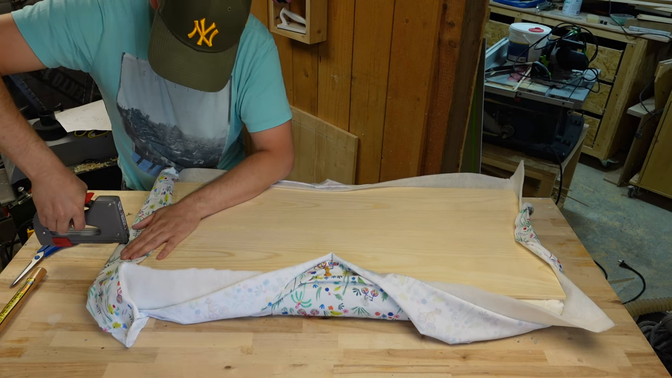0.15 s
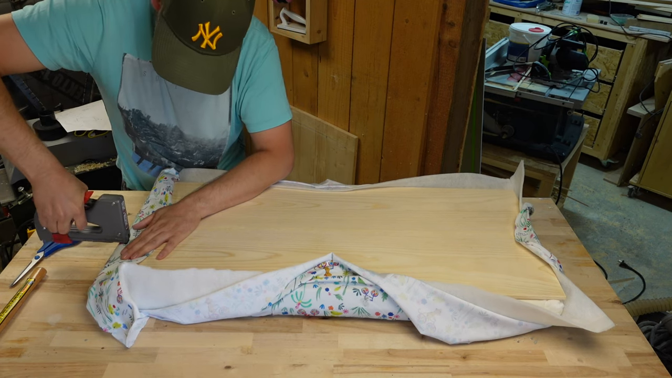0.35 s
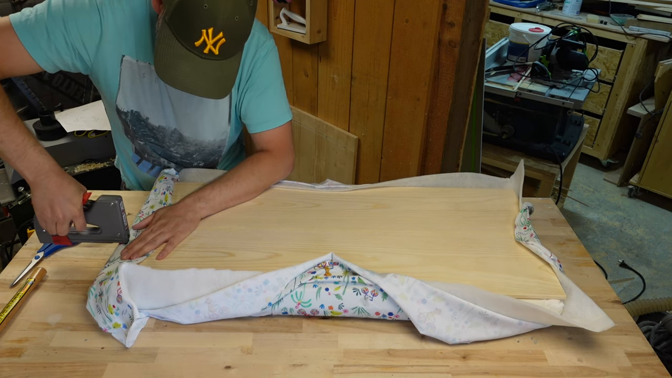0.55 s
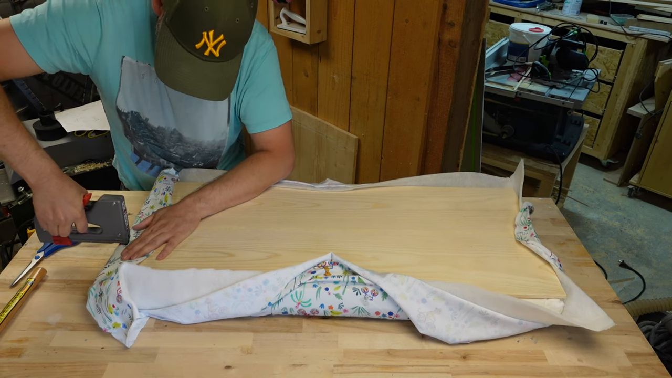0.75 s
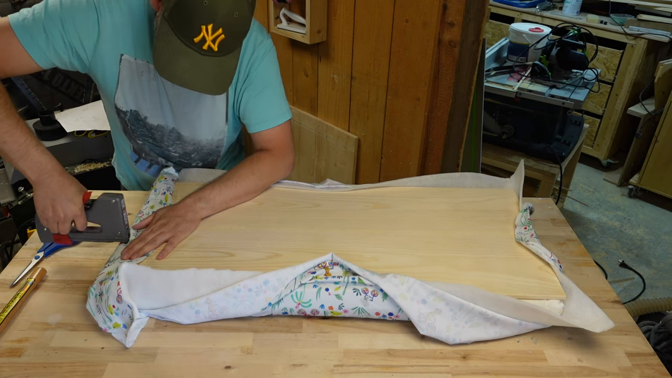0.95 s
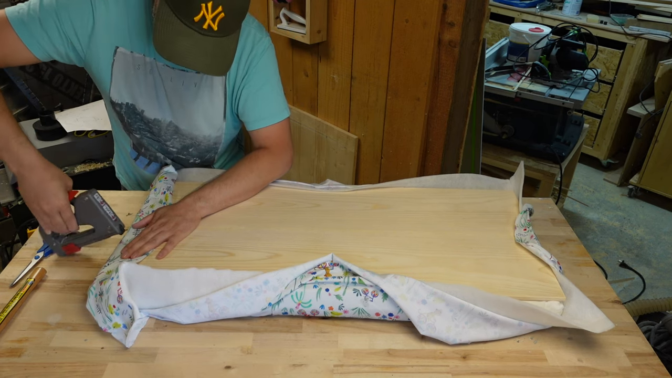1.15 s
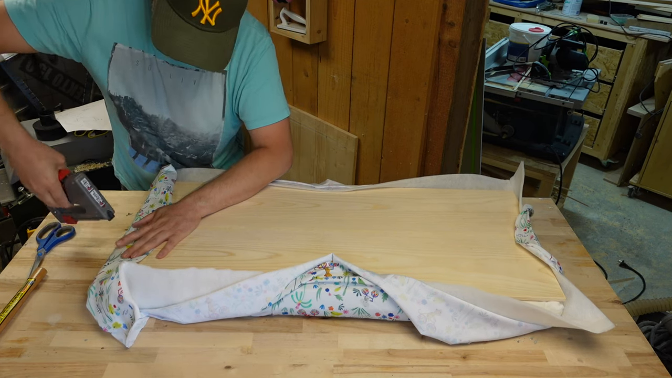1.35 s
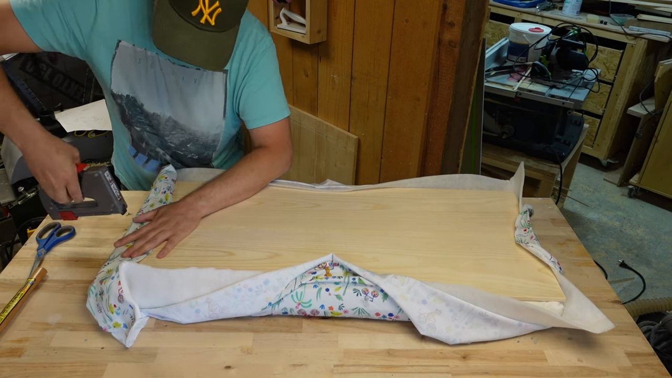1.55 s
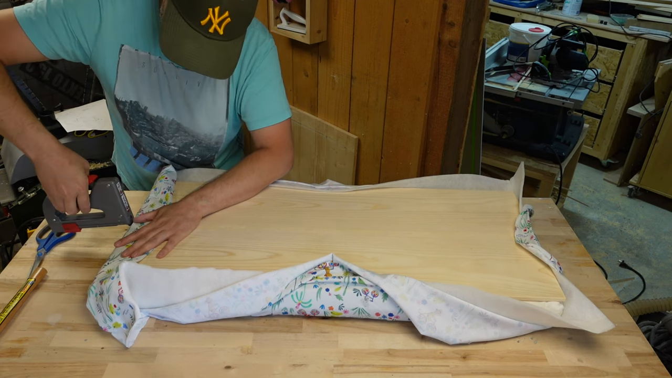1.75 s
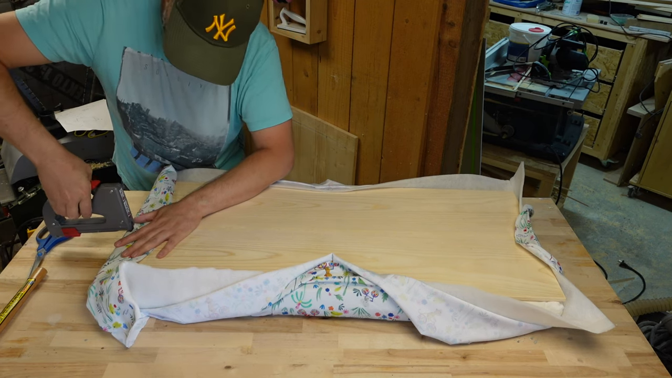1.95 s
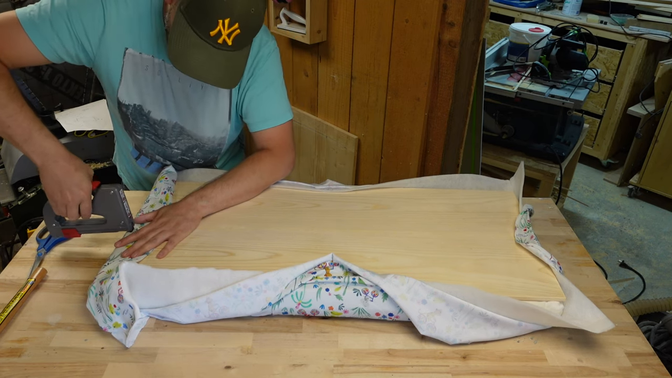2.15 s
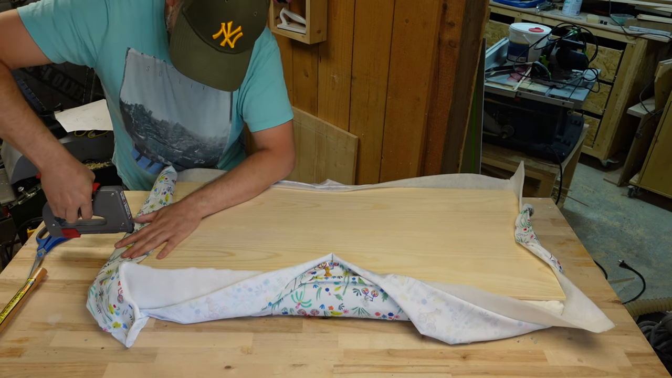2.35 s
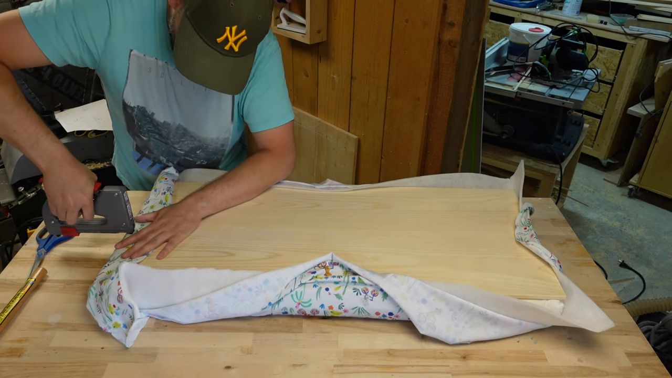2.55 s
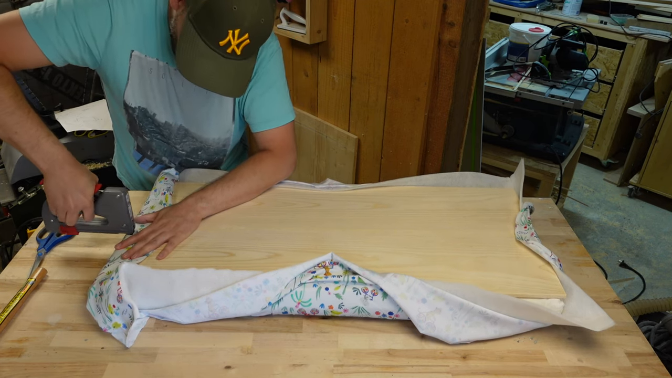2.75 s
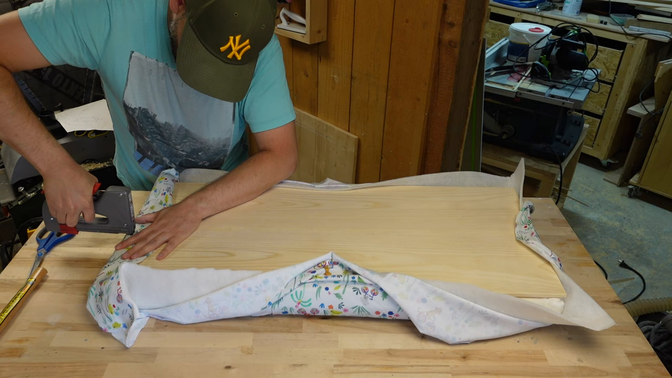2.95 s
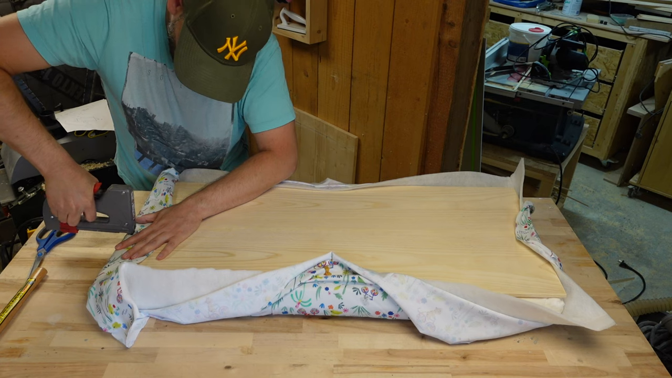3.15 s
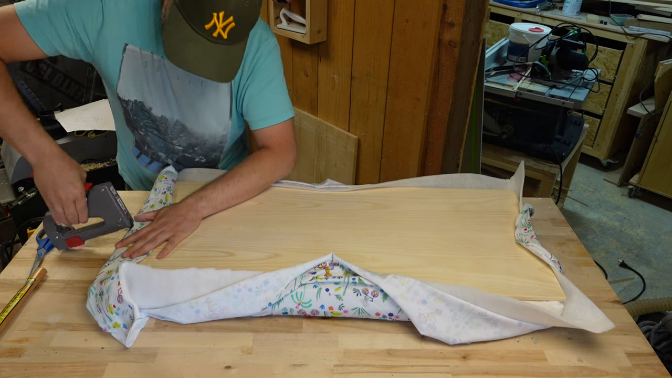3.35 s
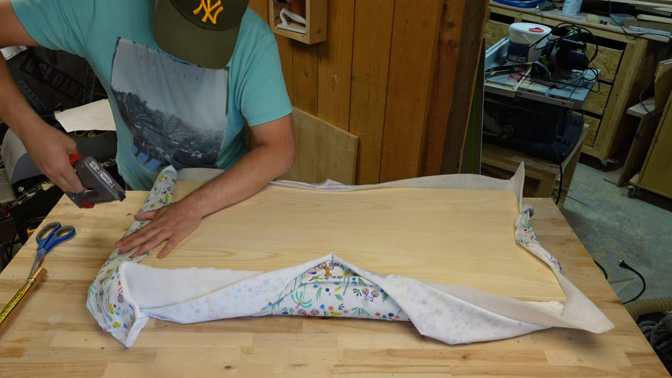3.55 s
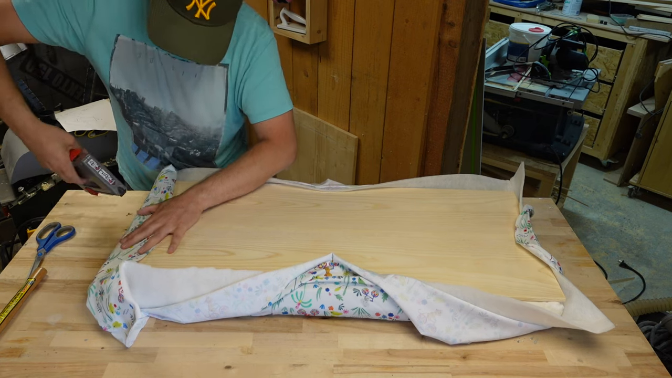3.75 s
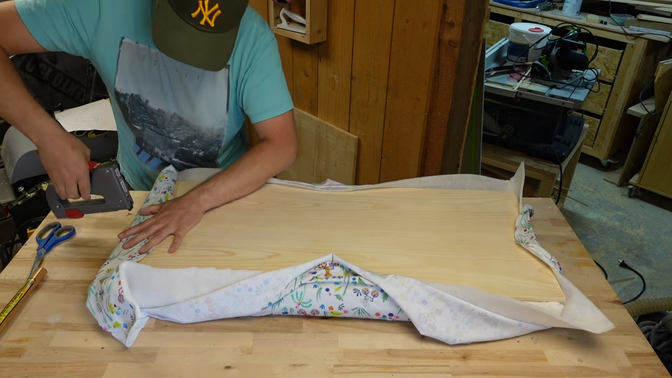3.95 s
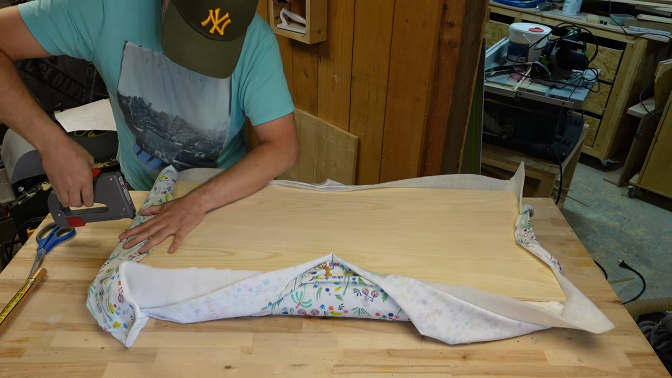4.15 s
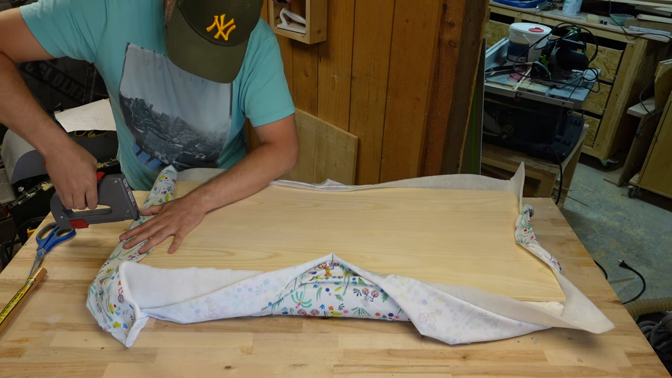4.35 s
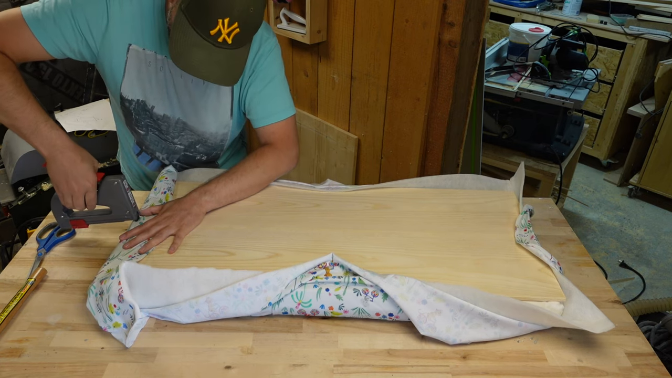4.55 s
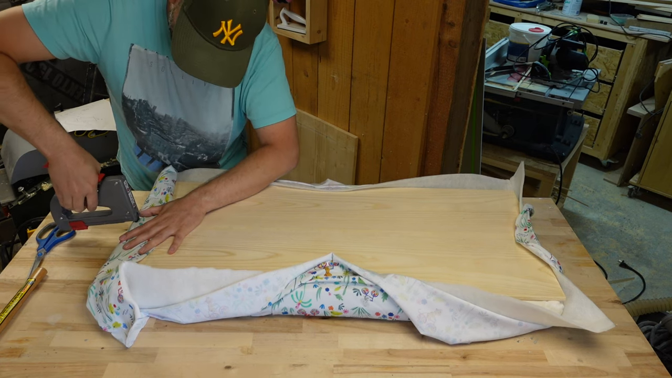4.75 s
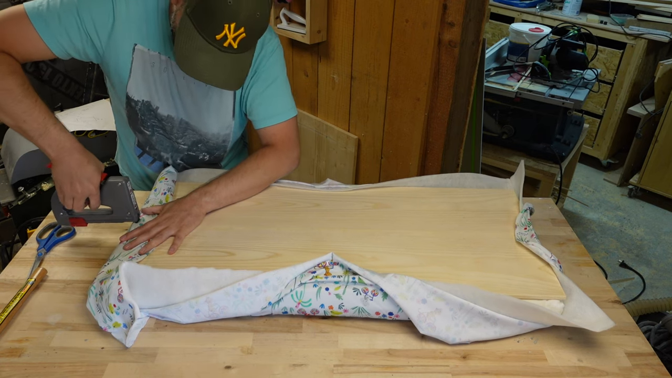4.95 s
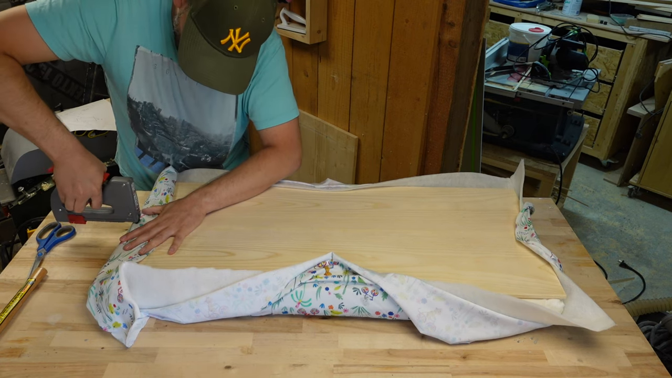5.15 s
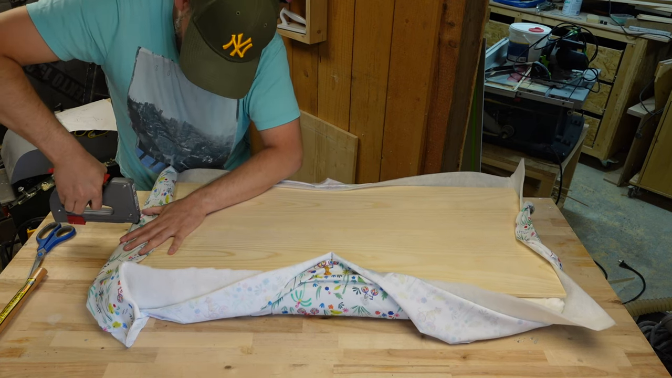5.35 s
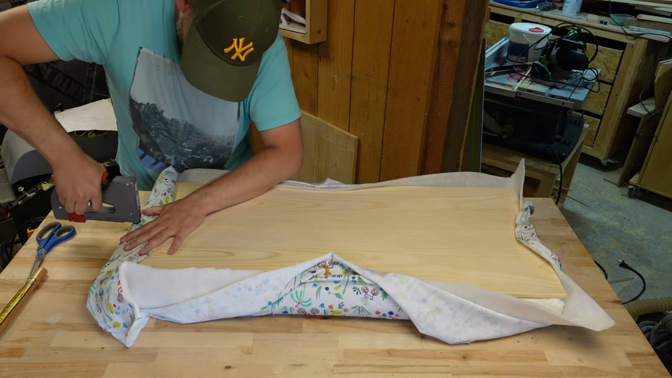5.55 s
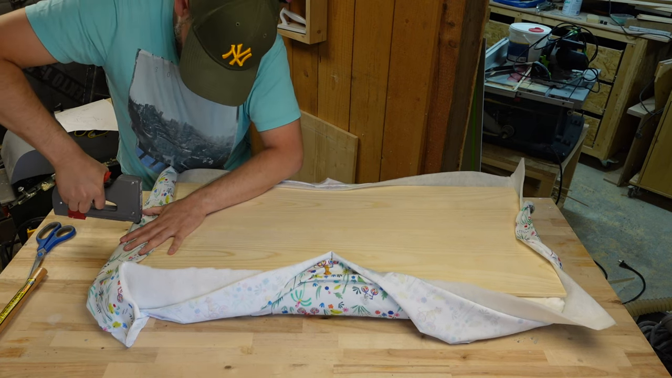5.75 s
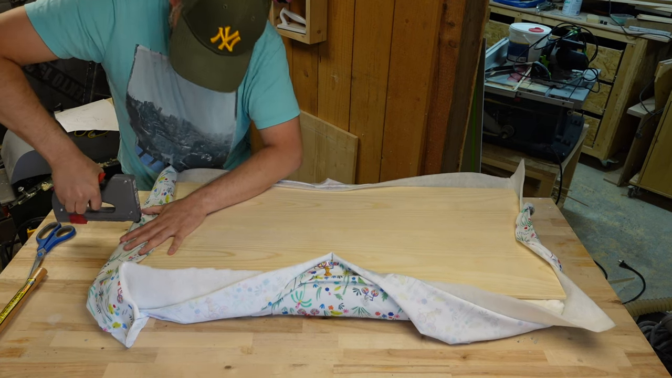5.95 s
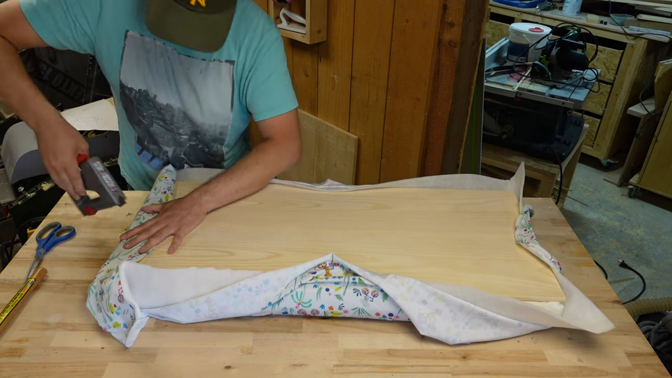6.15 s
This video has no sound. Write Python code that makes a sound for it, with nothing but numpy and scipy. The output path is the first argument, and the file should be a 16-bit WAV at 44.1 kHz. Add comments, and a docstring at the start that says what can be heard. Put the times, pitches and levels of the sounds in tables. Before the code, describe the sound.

A hand staple gun fires three times through fabric into a wooden board, heard close in a small workshop with a short echo and a faint steady hush. Light taps and spring ticks open, then the first loud, sharp bang comes at 0.75 seconds with a brief spring buzz. At about 1.0 the handle clatters back with a thin ping, the board thumps on the bench, and a few small knocks follow. Faint cloth rustle, scuffs and taps lead to the second bang at 3.0 seconds, with its clatter and thump at 3.3. After a quieter stretch, soft rustling returns near 4.8, and the gun taps and its spring ticks from about 5.1. The third bang lands at 5.75 seconds, followed by the handle's clatter and a wooden knock at about 6.0. The three shots are much louder than everything else.

```python
"""A hand staple gun fires three staples through fabric into a board on a workshop bench.
Its spring ticks under the squeeze, the latch trips and the striker bangs; then the handle clatters back
and the board knocks on the bench. Each impact is a brief force that excites the damped modes of a part.
Friction makes the cloth rustle between shots, the small room reverberates, and a limiter flattens
the loud blows."""
import sys
import numpy as np
from scipy import signal
from scipy.fft import rfft, irfft
from scipy.io import wavfile
from scipy.ndimage import uniform_filter1d, minimum_filter1d

SR = 44100
rng = np.random.default_rng(int(sys.argv[2]) if len(sys.argv) > 2 else 0)


def put_to_file(sound):
    """Save the sound as 16-bit audio at rate SR, in the file named by the first command-line argument."""
    columns = np.atleast_2d(sound).T  # one column per channel
    safe = np.clip(columns, -1, 1)
    whole_steps = np.round(safe * 32767)
    wavfile.write(sys.argv[1], SR, whole_steps.astype(np.int16))


N = 274302

# the latch trips and the striker drives a staple:
# (time [s], level [dB], resonance [Hz], latch lead [s], latch level [dB], latch resonance [Hz])
STAPLE_SHOTS = [(.751, 16.5, 1800, .031, -20.5, 3090), (3.030, 17, 1950, 0.013, -17, 1930),
                (5.7548, 17, 1830, .0174, -17, 1970)]
# the nose is pressed home: (time [s], level [dB], tilt [dB/octave], delay of the lever's slack [s])
NOSE_PRESSES = [(0.303, -33, 0, .031), (.478, -44.5, 8, .031), (2.787, -32.5, -0.5, .025),
                (5.497, -30, -1, 0.024)]
# normal modes of the gun's casing: (frequency [Hz], level [dB], T60 [s])
GUN_MODES = [(1064, -9, 0.16), (1374, -15.5, 0.11), (1553, -1, 0.13), (2080, 1, 0.018), (2330, -0.5, 0.017),
             (2910, 2.5, 0.1), (3000, -2, 0.077), (4080, -1, 0.059), (4650, -8, 0.019), (4300, -5, 0.045),
             (4800, -5.5, 0.013), (5630, -5.5, 0.083)]


def amp(db):
    """Decibels are logarithmic: 20 dB is a factor of ten in amplitude."""
    return 10 ** (np.asarray(db) / 20)


def unit_rms(x):
    """Normalisation to a mean power of one."""
    return x / np.sqrt(np.mean(x ** 2) + 1e-20)


def unit_blow(x):
    """Normalisation to the energy of 5 ms at full level."""
    return x / np.linalg.norm(x) * np.sqrt(.005 * SR)


def curve_at(points, hz):
    """Interpolation of (frequency [Hz], value) points on a logarithmic frequency axis."""
    point_hz, value = np.transpose(points)
    return np.interp(np.log(hz + 1), np.log(point_hz + 1), value)


def add(mix, start_s, sound):
    """Superposition: a sound sums into the mix from its start time."""
    part = mix[max(round(start_s * SR), 0):][:len(sound)]
    part += sound[:len(part)]


def filtered(x, spectrum):
    """Linear filtering multiplies the spectrum by a curve of (frequency [Hz], gain [dB])."""
    hz = np.fft.rfftfreq(len(x), 1 / SR)
    return irfft(rfft(x) * amp(curve_at(spectrum, hz)), len(x))


def resonant_noise(size, centre_hz, width_octaves):
    """A resonance driven by white noise passes a band about its centre."""
    octaves = np.log2((np.fft.rfftfreq(size, 1 / SR) + 1) / centre_hz)
    return irfft(rfft(rng.standard_normal(size)) / (1 + (octaves / width_octaves) ** 2), size)


def minimum_phase(gain_db):
    """Minimum phase gives the most compact causal impulse response with a given spectrum."""
    log_gain = np.log(amp(np.r_[gain_db, gain_db[-2:0:-1]]))
    return np.fft.ifft(np.exp(np.conj(signal.hilbert(log_gain)))).real


def contact_force(contact_s, size=4096):
    """Hard parts grind for a moment: their tiny impacts form a dying burst with a flat spectrum."""
    age = np.arange(size) / SR / contact_s
    burst = rfft(rng.standard_normal(size) * np.sqrt(age) * np.exp(-age))
    power = uniform_filter1d(abs(burst) ** 2, size=19)
    return irfft(burst / np.sqrt(power + 1e-12)) * np.exp(-age / 10)


def strike(blows, body, modes, ring_db, peak_db, peak_octaves, size=2048):
    """An impact gives a forced knock and free modal ringing; where it lands favours one resonance."""
    # blows: (time [s], level [dB], contact [s], tilt [dB/octave], resonance [Hz])
    out, t = np.zeros(N), np.arange(SR // 2) / SR
    hz = np.fft.rfftfreq(size, 1 / SR)
    for s, db, contact_s, tilt, main_hz in blows:
        octaves = np.log2(np.maximum(hz / main_hz, 1 / 10))
        colour_db = curve_at(body, hz) + tilt * octaves + peak_db * np.exp(-(octaves / peak_octaves) ** 2)
        knock = signal.fftconvolve(contact_force(contact_s), minimum_phase(colour_db)[:size])
        ring = np.zeros(len(t))
        for mode_hz, mode_db, t60 in modes:
            nearness = np.exp(-(np.log2(mode_hz / main_hz) / peak_octaves) ** 2)
            fade = amp(mode_db + peak_db * nearness - 60 * t / t60)
            ring += fade * np.sin(2 * np.pi * (mode_hz * t + rng.random()))
        ring *= 1 - np.exp(-t / contact_s)  # the ring builds up during contact
        add(out, s, amp(db) * unit_blow(knock))
        add(out, s, amp(db + ring_db) * unit_blow(ring))
    return out


def stereo(mid, side):
    """Long waves reach two close microphones almost alike, so the bass has little width."""
    # stereo width: (frequency [Hz], side gain [dB])
    width = [(100, -27.5), (250, -16), (600, -14.5), (2000, -13.5), (6000, -11), (16000, -10.5)]
    side = filtered(side, width)
    return np.array([mid + side, mid - side])


def room_air():
    """Ambient noise: the steady, mostly low hush of the room."""
    # noise spectrum: (frequency [Hz], level [dB])
    spectrum = [(15, -78.5), (25, -49), (175, -8), (317, -6.5), (363, -9.5), (659, -9.5), (1160, -11.5),
                (1480, -12), (1790, -12.5), (2910, -18.5), (3160, -20), (3920, -20), (5000, -26.5),
                (16000, -31.5)]
    mid, side = (unit_rms(filtered(noise, spectrum)) for noise in rng.standard_normal((2, N)))
    return amp(-62.5) * stereo(mid, amp(10.5) * side)


def early_sound(x, side_db=-9, spread_s=.001, size=256):
    """Early reflections off the bench top join the direct sound differently at each microphone."""
    glance = rng.standard_normal(size) * np.exp(-np.arange(size) / SR / spread_s)
    reflections = stereo(0, amp(side_db) * glance / np.linalg.norm(glance))
    return x + signal.oaconvolve(x[None], reflections, axes=1)[:, :N]


def workshop(x, wet_db, build_s, size=256):
    """Reverberation in a small cluttered room: echoes build quickly and each band decays at its own rate."""
    # reverberation time: (frequency [Hz], T60 [s])
    decay_times = [(120, .34), (300, .27), (700, .24), (2000, .225), (5000, .215), (12000, .205)]
    hz, t, bands = signal.stft(rng.standard_normal((2, SR)), SR, nperseg=size)
    decay = amp(-60 * t / curve_at(decay_times, hz)[:, None])
    _, tails = signal.istft(bands * decay, SR, nperseg=size)
    tails *= 1 - np.exp(-(np.arange(tails.shape[1]) / SR / build_s) ** 2)
    tails /= np.linalg.norm(tails, axis=1, keepdims=True)
    return early_sound(x) + amp(wet_db) * signal.fftconvolve(x[None], stereo(*tails), axes=1)[:, :N]


def cloth_envelope(rise_s=.045, fade_db_per_s=91.5, resting_db=-70.5):
    """Friction noise follows motion: each pull swells, holds and fades; the hand never quite rests."""
    # cloth is drawn over the wood: (time [s], duration [s], level [dB])
    pulls = [(.275, .06, -54.5), (0.655, 0.54, -58.5), (1.374, 0.11, -56.5), (2.331, .3, -59),
             (2.726, 0.35, -57), (3.581, 0.14, -53.5), (4.837, 0.17, -58.5), (5.065, .22, -55),
             (5.428, 0.68, -62.5)]
    level = np.full(N, amp(resting_db))
    for start_s, length_s, db in pulls:
        t = np.arange(N) / SR - start_s
        swell = np.clip(t / rise_s, 0, 1)
        level = np.maximum(level, swell * amp(db - fade_db_per_s * np.maximum(t - length_s, 0)))
    return level


def cloth_rustle(catches_per_s=330, spread_db=4.5, catch_db=-4.5, flutter_db=2.5):
    """Stick-slip friction: the weave hisses unevenly over the wood as single threads catch and let go."""
    # friction spectrum: (frequency [Hz], level [dB])
    spectrum = [(50, -20.5), (120, 0.5), (200, 6), (450, -5.5), (1500, -1), (3000, -3.5), (6000, -4.5),
                (9000, -8.5), (12500, -12.5), (16000, -25)]
    catches = (rng.random(N) < catches_per_s / SR) * rng.standard_normal(N)
    catches *= amp(spread_db * np.minimum(rng.exponential(1, N), 3))
    friction = rng.standard_normal(N) + amp(catch_db) * unit_rms(catches)
    slips = unit_rms(uniform_filter1d(uniform_filter1d(rng.standard_normal(N), size=600), size=300))
    return unit_rms(filtered(friction, spectrum)) * cloth_envelope() * amp(flutter_db * slips)


def nose_scuffs():
    """Sliding friction drives one narrow resonance of the casing."""
    # the nose rubs along the cloth: (time [s], level [dB], duration [s], resonance [Hz])
    scuffs = [(2.229, -67, .07, 5960), (2.325, -55, 0.04, 2080), (2.329, -61, 0.028, 5700),
              (2.578, -62, 0.058, 5360), (2.652, -63.5, 0.096, 4280), (4.868, -61, 0.03, 4730),
              (5.481, -50, .016, 2210)]
    out = np.zeros(N)
    for s, db, length_s, hz in scuffs:
        rub = resonant_noise(round(length_s * SR), hz, width_octaves=.2)
        add(out, s, amp(db) * unit_rms(rub * signal.windows.tukey(len(rub), .5)))
    return out


def nose_taps(touch_contact_s=.002, press_contact_s=.0035, press_hz=2330):
    """Light touches and firmer presses of the nose on the board excite the casing's modes."""
    # light touches: (time [s], level [dB], tilt [dB/octave], resonance [Hz])
    touches = [(0.0458, -31, 1, 5330), (1.4743, -33, 2, 5100), (1.985, -46, 1.5, 4950),
               (2.537, -36.5, -1.5, 2400), (3.612, -43.5, -3.5, 2500), (3.633, -36, 1, 5130),
               (4.400, -50.5, 1, 5530), (5.133, -30, 0.5, 2870)]
    # radiation of the nose: (frequency [Hz], level [dB])
    body = [(40, -11.5), (180, -5), (380, -16.5), (520, -6.5), (800, -13.5), (1150, -3.5), (1950, -2),
            (2400, 3.5), (3450, -5.5), (4000, -2.5), (5400, -1), (7500, -7.5), (10000, -14), (16000, -27)]
    blows = [(s, db, touch_contact_s, tilt, hz) for s, db, tilt, hz in touches]
    blows += [(s, db, press_contact_s, tilt, press_hz) for s, db, tilt, _ in NOSE_PRESSES]
    return strike(blows, body, GUN_MODES, ring_db=-9, peak_db=2.5, peak_octaves=.1)


def spring_ticks(contact_s=.0018, tilt=1.98, main_hz=5830):
    """Stick-slip under load: each slip of the spring is a small impulse to its modes."""
    # slips: (time [s], level [dB])
    slips = [(.074, -37.5), (0.374, -32.5), (2.843, -33), (5.212, -32.5), (5.322, -36.5), (5.431, -36.5),
             (5.695, -29.5)]
    # radiation of the spring: (frequency [Hz], level [dB])
    body = [(60, -30), (200, -14.5), (900, -21), (2500, -4), (3700, -11), (4200, -5.5), (5200, -6.5),
            (5800, -4), (7400, -22), (9100, -5.5), (11000, -20.5), (16000, -35.5)]
    # its modes: (frequency [Hz], level [dB], T60 [s])
    modes = [(2530, -6.5, 0.043), (4120, 1, 0.048), (4530, -1.5, 0.032), (5620, -4.5, 0.05),
             (6300, 3.5, .05), (5800, -8, 0.1), (6300, -14, 0.083), (9000, 1, 0.064), (9950, -16, 0.061),
             (9200, -2.5, .07)]
    blows = [(s, db, contact_s, tilt, main_hz) for s, db in slips]
    return strike(blows, body, modes, ring_db=-18, peak_db=10.5, peak_octaves=.055)


def coil_buzz(relative_db=-38, t60_s=.5):
    """Damped vibration: the turns of the released spring chatter together and decay exponentially."""
    out, t = np.zeros(N), np.arange(SR // 2) / SR
    for s, db, *_ in STAPLE_SHOTS:
        buzz = resonant_noise(len(t), centre_hz=2100, width_octaves=.46)
        add(out, s, unit_rms(buzz) * amp(db + relative_db - 60 * t / t60_s))
    return out


def casing_clacks(lever_hz=5960):
    """Structure-borne sound: the casing radiates small impacts of the lever, the latch and the gun itself."""
    # the pivot creaks as the grip changes: (time [s], level [dB], tilt [dB/octave])
    pivot_creaks = [(.471, -46, 15), (.611, -54.5, 10), (.974, -38, -1), (2.975, -53, 1.5),
                    (5.080, -49.5, 0), (5.097, -50, 8), (5.986, -31, -3.5)]
    # the eased gun knocks about on the board:
    # (time [s], level [dB], contact [s], tilt [dB/octave], resonance [Hz])
    knocks = [(1.165, -31.5, 0.0011, -2, 4830), (1.1945, -16.5, 0.0039, -2.2, 2130),
              (1.266, -21, 0.0017, -5.5, 2400), (3.332, -14, .003, -3.5, 2360),
              (6.030, -17, 0.00061, 3, 6200), (6.088, -11, .013, -7, 1450)]
    # radiation of the casing: (frequency [Hz], level [dB])
    body = [(40, -41.5), (110, -23), (220, -12.5), (600, -12), (900, -6.5), (1200, -6), (2400, -1),
            (3600, -5), (5300, -3.5), (7500, -10), (11000, -13.5), (16000, -21.5)]
    # the lever takes up its slack after a press; the latch scrapes off its edge, then trips
    slack = [(s + delay_s, db - 5, .0019, 5.8, lever_hz) for s, db, _, delay_s in NOSE_PRESSES]
    creaks = [(s, db, .0033, tilt, lever_hz) for s, db, tilt in pivot_creaks]
    trips = [(s - lead_s, db, .0032, 1.5, hz) for s, _, _, lead_s, db, hz in STAPLE_SHOTS]
    scrapes = [(s - .0025, db - 10, .0014, 3.5, lever_hz) for s, db, *_ in trips]
    blows = slack + creaks + scrapes + trips + knocks
    return strike(blows, body, GUN_MODES, ring_db=-17.5, peak_db=6, peak_octaves=.21)


def striker_pings():
    """The striker snaps back over the next staple and rings in free vibration at high frequencies."""
    # snaps: (time [s], level [dB], contact [s], tilt [dB/octave], resonance [Hz])
    snaps = [(1.0875, -11, 0.0022, -6, 7430), (3.315, -6.5, 0.008, -5.5, 9800),
             (6.0225, -7, 0.0016, -6, 7400)]
    # radiation of the striker: (frequency [Hz], level [dB])
    body = [(200, -34), (3000, -24.5), (5500, -6), (6700, -7), (7500, 2.5), (8300, -6), (11000, -5.5),
            (12600, -1), (16000, -6.5)]
    # its modes: (frequency [Hz], level [dB], T60 [s])
    modes = [(6800, -4, 0.074), (7360, -1, 0.09), (8000, -4.5, .08), (9680, -4.5, 0.14), (13000, -4.5, .04)]
    return strike(snaps, body, modes, ring_db=-14, peak_db=4.5, peak_octaves=.067)


def board_thumps():
    """Impacts on the bench excite the low, damped modes of the board."""
    # impacts: (time [s], level [dB], contact [s], tilt [dB/octave], resonance [Hz])
    impacts = [(1.053, -7, 0.0036, 3, 310), (1.072, -6, 0.006, 2, 215), (1.112, -14, 0.014, -1, 623),
               (3.331, -11.5, .008, 0, 310), (3.352, -10.5, 0.014, -1, 238.3),
               (6.031, -3.5, 0.0075, 3, 305), (6.072, -11.5, 0.013, 0.5, 225)]
    # radiation of the board: (frequency [Hz], level [dB])
    body = [(30, -35.5), (70, -21), (100, -12.5), (135, -1.5), (230, 1), (320, 2), (420, -7.5), (520, -6.5),
            (650, -7), (1000, -10), (2000, -20), (5000, -45), (16000, -60.5)]
    # its modes: (frequency [Hz], level [dB], T60 [s])
    modes = [(122, -5.5, .28), (162, -7, .17), (211.4, -3.5, .24), (239, 1.5, .1), (308.8, -3, .11),
             (399, -2, .17), (421, -6.5, .06), (577, -5, .16), (639, -6.5, .15), (757, -8.5, 0.11)]
    return strike(impacts, body, modes, ring_db=-8, peak_db=5, peak_octaves=.25)


def handle_clatter(unhook_contact_s=.0013, stop_contact_s=.0028, bounce_s=.007, loss_db=7, tilt_step=4.5):
    """Inelastic collisions: the handle unhooks and bounces on its stop, each time weaker and thinner."""
    # the handle flies back: (time [s], level [dB], tilt [dB/octave], resonance [Hz],
    # unhook lead [s], unhook level [dB], unhook tilt [dB/octave])
    returns = [(1.0306, -1, -2, 1490, 0.0041, -23.5, 4), (3.294, 0, 0, 2032, .004, -25, 1.5),
               (6.009, -1, 0.5, 1420, .0085, -18, 3.5)]
    # radiation of the handle: (frequency [Hz], level [dB])
    body = [(40, -46), (220, -32), (600, -24), (900, -15), (1300, -3), (2200, -1.5), (3600, -6.5),
            (5300, -5.5), (7500, -10), (11000, -15), (16000, -21)]
    blows = []
    for s, db, tilt, hz, lead_s, unhook_db, unhook_tilt in returns:
        blows.append((s - lead_s, unhook_db, unhook_contact_s, unhook_tilt, hz))
        for k in range(3):
            blows.append((s + k * bounce_s, db - k * loss_db, stop_contact_s, tilt + k * tilt_step, hz))
    return strike(blows, body, GUN_MODES, ring_db=-13.5, peak_db=7.5, peak_octaves=.15)


def staple_shots(contact_s=.0026, tilt=1.2):
    """Impulsive excitation: the striker's short blow on a staple is a broadband bang. One track a shot."""
    # radiation of a shot: (frequency [Hz], level [dB])
    body = [(40, -48), (150, -28.5), (320, -6), (480, -8), (780, -13), (1200, -3.5), (2000, -0.5),
            (3100, -1), (3800, -8), (4600, -6.5), (5900, -8), (7000, -15.5), (10500, -20), (16000, -32)]
    # the modes it excites: (frequency [Hz], level [dB], T60 [s])
    modes = [(1510, -6, 0.2), (1840, 4.5, 0.061), (1997, 3, 0.091), (2325, 1.5, 0.12), (2560, -8, 0.092),
             (2600, -6, 0.11), (3170, -4, 0.071), (3190, -3.5, .05)]
    blows = [(s, db, contact_s, tilt, hz) for s, db, hz, *_ in STAPLE_SHOTS]
    return [strike([blow], body, modes, ring_db=-22, peak_db=3.5, peak_octaves=.41) for blow in blows]


def scene():
    """Superposition of gun, board and cloth, with their reverberation, over the ambient noise."""
    shots = staple_shots()
    mechanism = nose_taps() + casing_clacks() + handle_clatter() + spring_ticks() + striker_pings()
    thumps = board_thumps()
    rustle = cloth_rustle() + nose_scuffs()
    handling = workshop(rustle + mechanism + coil_buzz(), wet_db=-4.5, build_s=.0042)
    bench = workshop(thumps, wet_db=-5.5, build_s=.0095)
    # each shot comes from a new spot, with its own echoes
    bangs = sum(workshop(shot, wet_db=-1.5, build_s=.0056) for shot in shots)
    return room_air() + handling + bench + bangs


def limiter(x, ceiling_db, recover_db_per_s, size=66):
    """Peak limiting: the gain drops at once on a peak and recovers steadily."""
    peak_db = 20 * np.log10(abs(x).max(0) + 1e-9)
    over_db = -minimum_filter1d(np.minimum(ceiling_db - peak_db, 0), size)
    recovery_db = np.arange(N) / SR * recover_db_per_s
    held_db = np.maximum.accumulate(over_db + recovery_db) - recovery_db
    return x * amp(-uniform_filter1d(held_db, size))


def record(dry):
    """Dynamic range and bandwidth are restricted: a limiter, then a bass cut and a treble cut."""
    low_hz, high_hz = 55, 15900
    bass_cut = signal.butter(3, low_hz, "highpass", fs=SR, output="sos")
    treble_cut = signal.firwin(255, high_hz, window=("kaiser", 8), fs=SR)
    limited = limiter(dry, ceiling_db=-4, recover_db_per_s=294.5)
    return signal.oaconvolve(signal.sosfilt(bass_cut, limited), treble_cut[None], "same")


dry = scene()
out = record(dry)
put_to_file(out)
```